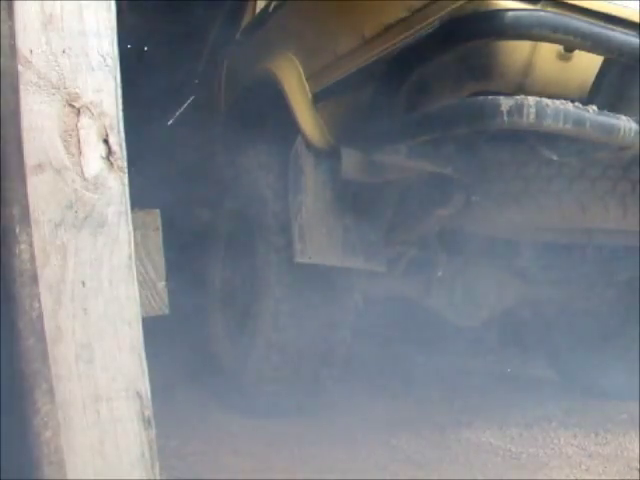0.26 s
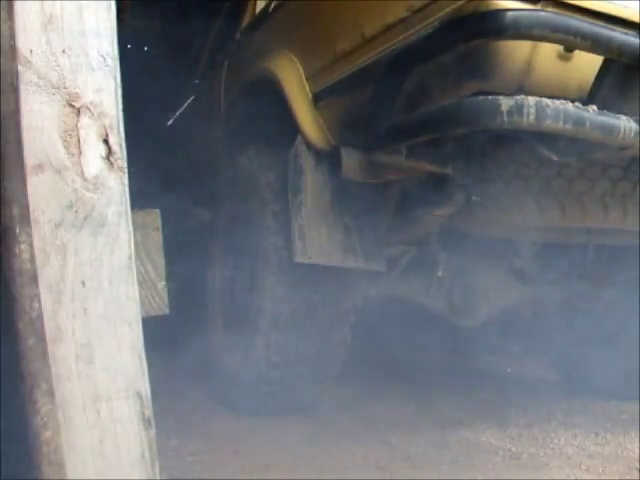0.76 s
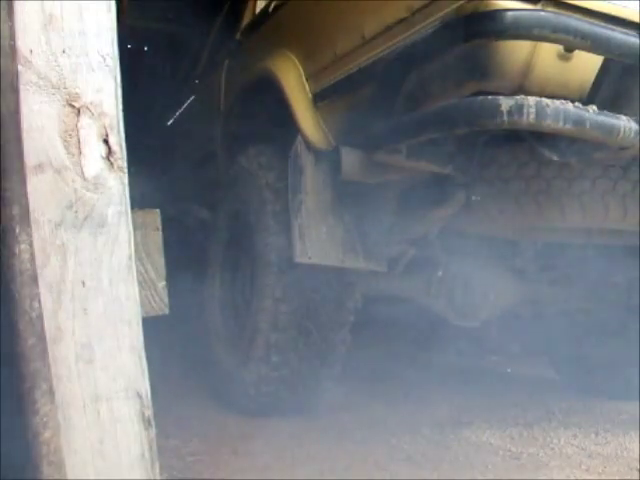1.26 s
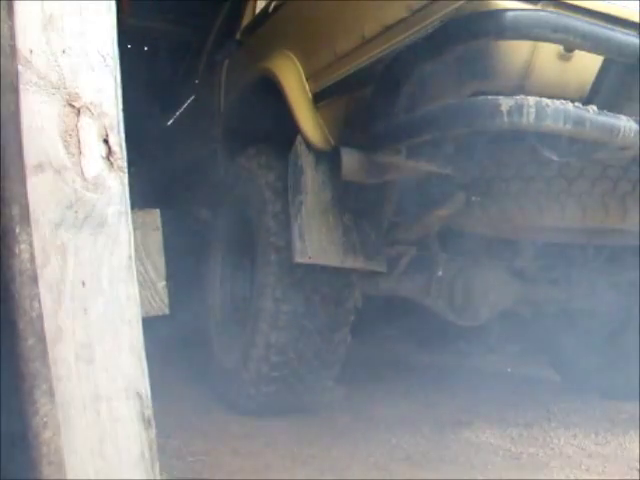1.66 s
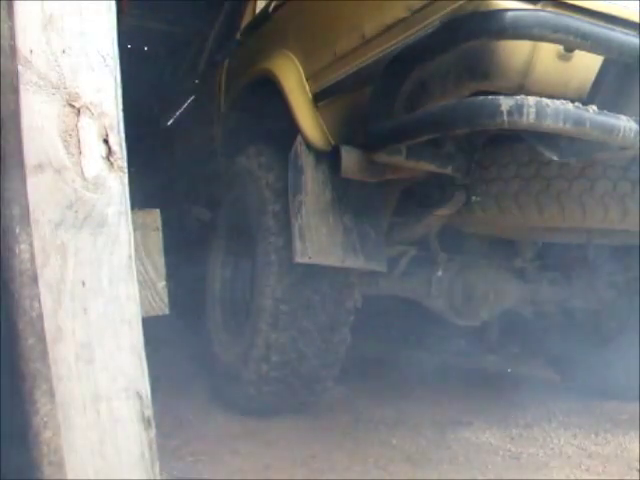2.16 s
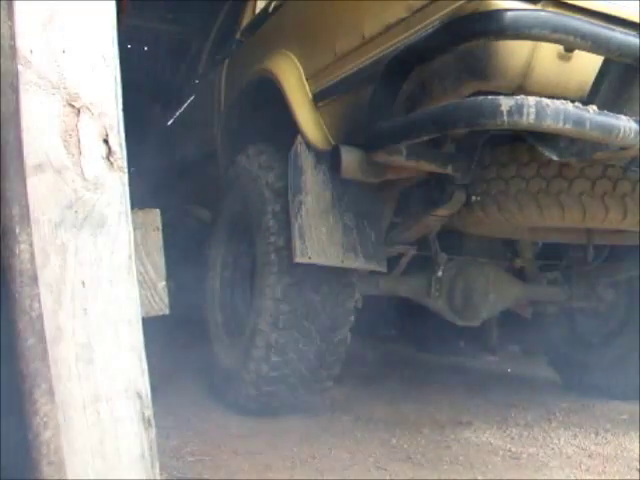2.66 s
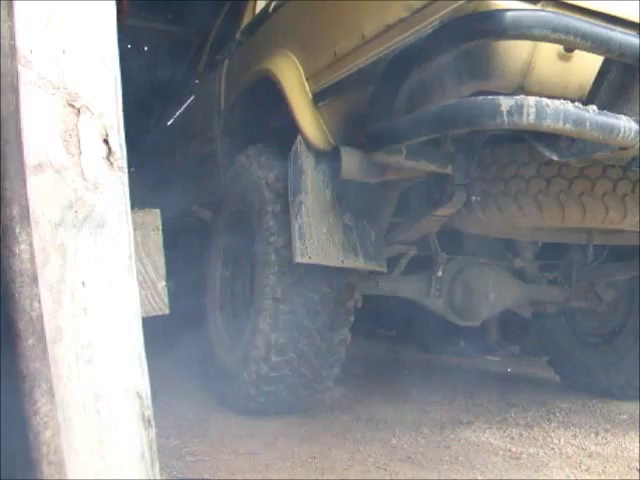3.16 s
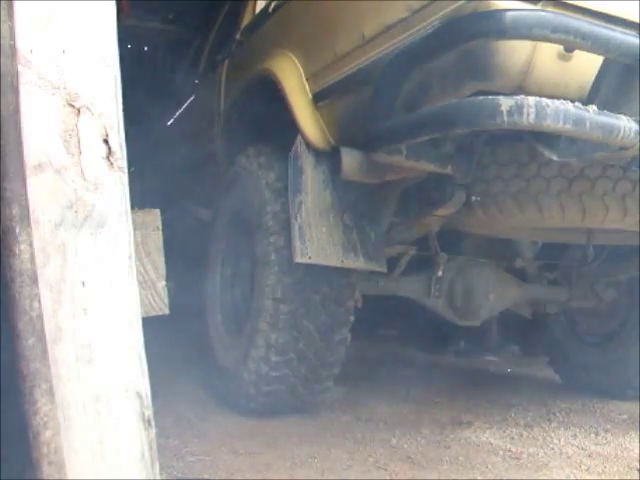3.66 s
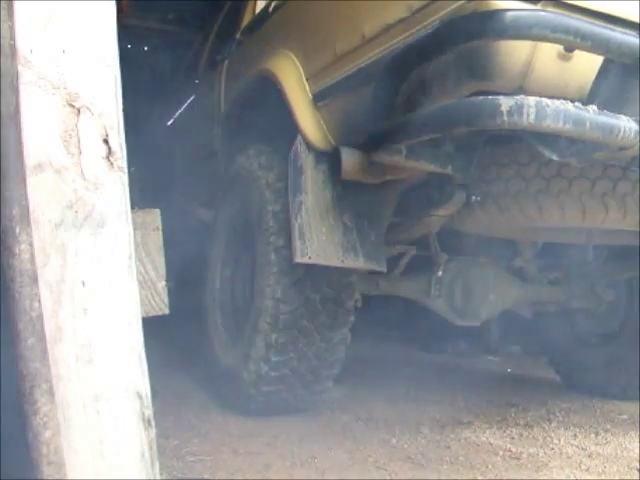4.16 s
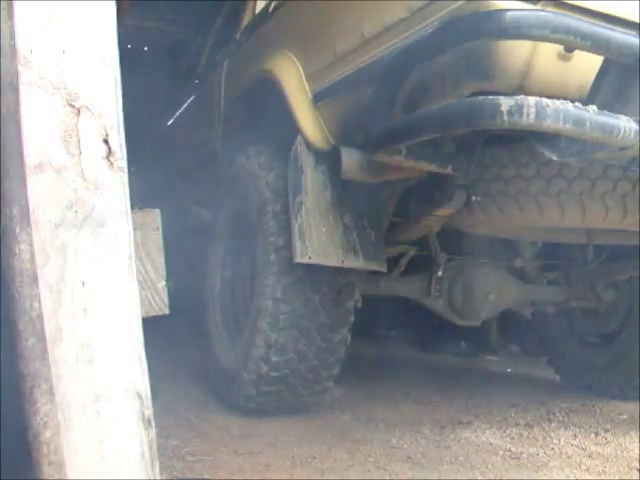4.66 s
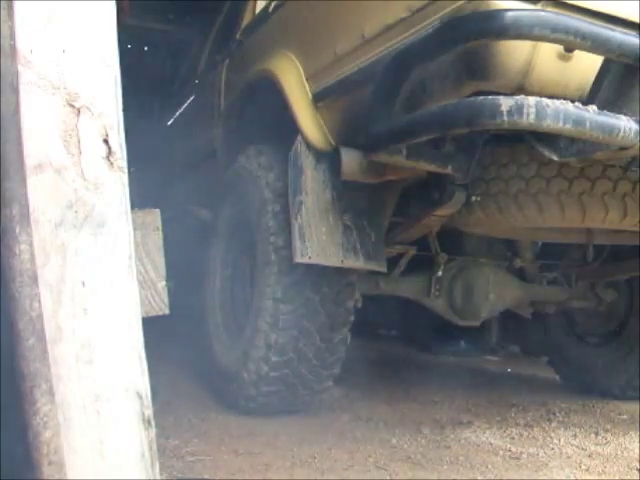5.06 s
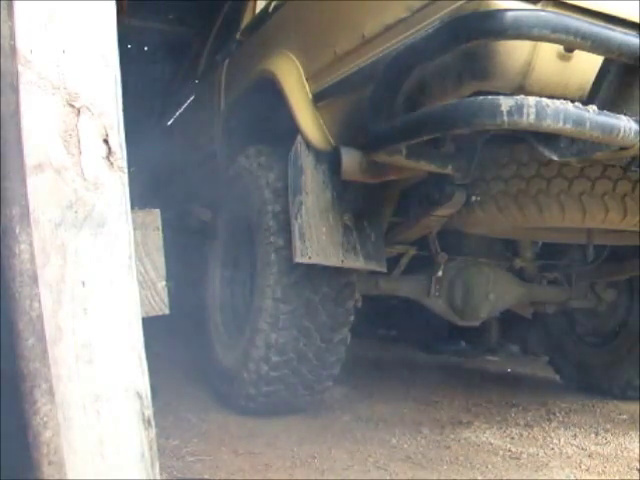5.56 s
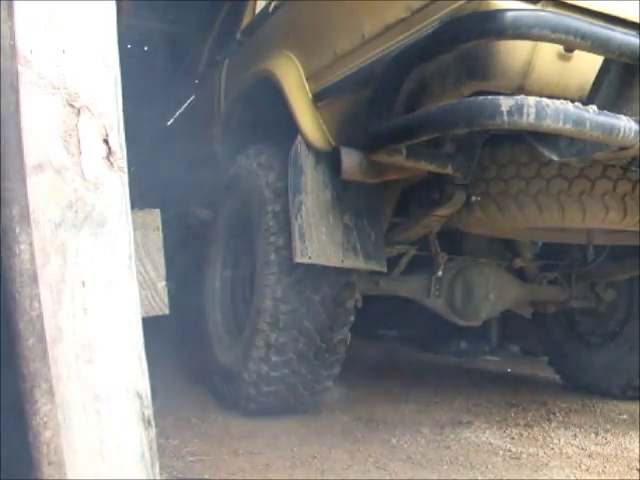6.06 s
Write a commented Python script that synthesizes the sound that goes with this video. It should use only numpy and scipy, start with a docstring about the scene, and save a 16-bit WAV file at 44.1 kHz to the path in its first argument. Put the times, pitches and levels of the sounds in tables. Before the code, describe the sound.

Continuous diesel clatter from a truck in a shed, already running at the start and still running at the end. Rapid knocking varies from soft to hard bangs, with a few firings barely catching. A rough low bark in the exhaust fades over the first two seconds while a deep steady boom grows. Piston thuds, light metal rattle and noisy fan rush fill the gaps, with short shed reverberation. Close mono microphone, dull extreme treble.

```python
"""Uneven diesel knocking comes first: a cold four-cylinder truck idles in a shed, settling from 760 to 718 rpm.
Each firing strikes the block with coloured echo clusters, and hard firings ring more strongly near 2 kHz.
Puffs through pipe resonances throb over a tone at three times the firing rate; one cylinder's bark fades.
Pistons thud and loose metal clacks in shaped noise, over a rush of fan, gears and gas made of coloured noise."""
import sys
import numpy as np
from scipy import signal
from scipy.fft import rfft, irfft, next_fast_len
from scipy.io import wavfile
from scipy.ndimage import uniform_filter1d

SR = 44100
rng = np.random.default_rng(int(sys.argv[2]) if len(sys.argv) > 2 else 0)


def master_out(mix):
    """Clip the mix to full scale and print it as 16-bit PCM to the path in sys.argv[1]."""
    frames = np.transpose(np.atleast_2d(mix))
    ceiling = np.clip(frames, -1, 1)
    pcm = np.round(ceiling * 32767).astype(np.int16)
    wavfile.write(sys.argv[1], SR, pcm)


N = 279153
TIME = np.arange(N) / SR


def amp(db):
    """Decibels to gain."""
    return 10 ** (np.asarray(db) / 20)


def unit(x):
    """Scale to rms 1."""
    return x / np.sqrt(np.mean(x ** 2) + 1e-20)


def curves(rows):
    """One value per sample for each column after the time."""
    knots, *columns = np.transpose(rows)
    return [np.interp(TIME, knots, column) for column in columns]


def colour(points, hz):
    """Gain of (f/Hz, level/dB) points joined on a log axis."""
    f, db = np.transpose(points)
    return amp(np.interp(np.log(hz + 1), np.log(f + 1), db))


def filtered(x, response):
    """x shaped by a response of frequency, padded so that its tail does not wrap round."""
    size = next_fast_len(len(x) + 8192)
    hz = np.fft.rfftfreq(size, 1 / SR)
    return irfft(rfft(x, size) * response(hz), size)[:len(x)]


def strike(times, sizes, response):
    """A copy of the response at each time, scaled by its size."""
    samples = np.clip(np.round(times * SR).astype(int), 0, N)
    train = np.bincount(samples, sizes, N + 1)
    return signal.fftconvolve(train, response)[:N]


# resonances of block, sump and chassis: f/Hz, width/Hz, lift/dB (negative is a dip)
BLOCK_RESONANCES = [(416, 140, 4.5), (559, 11, 8), (625, 13, 9), (735, 39, 6.5), (829, 25, 5),
                    (1132, 41, 6), (1581, 18, 9), (1798, 14, 6), (1986, 23, 5.5), (1954, 26, -3.5),
                    (2100, 26, -2.5), (2220, 26, -2.5), (2220, 31, 4.5), (2360, 22, 6), (2486, 50, 7.5)]


def metal(x, points):
    """x coloured by the points and by the engine's resonances, at rms 1."""
    def response(hz):
        lift_db = sum(db / (1 + (2 * (hz - f) / width) ** 2) for f, width, db in BLOCK_RESONANCES)
        return colour(points, hz) * amp(lift_db)
    return unit(filtered(x, response))


def echoes(fade, smoothing_bins=41):
    """A dense cluster of echoes under a fade, even in colour, of energy 1."""
    spectrum = rfft(fade * rng.standard_normal(len(fade)))
    smooth_power = uniform_filter1d(np.abs(spectrum) ** 2, smoothing_bins)
    cluster = irfft(spectrum / np.sqrt(smooth_power), len(fade))
    return cluster / np.linalg.norm(cluster)


def blows(times, cylinder, db, points, fade, fresh):
    """Each cylinder's blow repeats its own echo cluster; the fresh share of power is ever-new loose rattle."""
    power = np.abs(strike(times, amp(db) ** 2, fade ** 2))
    repeated = np.zeros(N)
    for c in range(len(CYLINDERS)):
        own = cylinder == c
        repeated += strike(times[own], amp(db[own]), echoes(fade))
    rattle = np.sqrt(power) * metal(rng.standard_normal(N), points)
    repeated_gain = np.sqrt((1 - fresh) * np.mean(power))
    return repeated_gain * metal(repeated, points) + np.sqrt(fresh) * rattle


# crankshaft speed: t/s, speed/rpm
CRANK_SPEED = [(0, 760.2), (.4, 763.4), (.9, 746.3), (1.7, 744.4), (2.2, 733.4), (3.2, 731.1), (4, 728.4),
               (4.6, 730.3), (5.2, 722.6), (6.33, 718.4)]


def firings(count=4):
    """Phase in firings per sample, then each firing's time and cylinder: four to every two crank turns."""
    turns_per_s = curves(CRANK_SPEED)[0] / 60
    phase = np.cumsum(turns_per_s * 2) / SR
    number = np.arange(int(phase[-1]) + 1)
    return phase, np.interp(number, phase, TIME), number % count


# loudness of the rush of fan, gears and gas: t/s, level/dB
RUSH_LEVEL = [(0, -29), (2, -30.5), (4.5, -28), (6.33, -32.5)]
# tone of the rush, before the block's resonances: f/Hz, level/dB
RUSH_COLOUR = [(25, -0.5), (60, -3.5), (170, 14), (280, 0), (410, 0.5), (600, -0.5), (1000, -4.5),
               (2200, -6.5), (3100, -4.5), (4200, -9.5), (5500, -12.5), (7300, -8), (8500, -18)]


def fan():
    """Fan, gears and gas make a continuous rush: noise through the engine's resonances, slowly changing level."""
    return amp(curves(RUSH_LEVEL)[0]) * metal(rng.standard_normal(N), RUSH_COLOUR)


# clacks of loose metal that stand out, loud or bright:
# t/s, level/dB before the fade, bright edge against it/dB
STANDOUT_CLACKS = [(.473, -36, 2.5), (.792, -28.5, 0.5), (1.434, -36, -4), (2.898, -23.5, -1.5),
                   (4.095, -28, -4), (5.527, -30, -13), (5.704, -33.5, 2), (5.871, -36, 5)]
# body of a clack, before the block's resonances: f/Hz, level/dB
CLACK_COLOUR = [(500, -21), (1300, -12), (1800, -1), (2500, -13.5), (3200, 5.5), (3700, -7.5), (4350, 5.5),
                (5200, -10), (8000, -21.5)]
# bright edge of a clack, before the block's resonances: f/Hz, level/dB
SPARKLE_COLOUR = [(3000, -17), (5500, -9.5), (6300, 3.5), (7200, 2.5), (8500, -12)]


def clacks(jolts, attack_s=0.004, t60_s=0.25, jolt_db=-35, jolt_scatter_db=2.5, jolt_edge_db=-15):
    """Each jolt shakes loose metal lightly; a few clacks stand out, loud or bright. All die away in the shed."""
    light_db = jolt_db + jolt_scatter_db * rng.standard_normal(len(jolts))
    light = np.column_stack([jolts, light_db, np.full(len(jolts), jolt_edge_db)])
    times, db, edge_db = np.vstack([STANDOUT_CLACKS, light]).T
    t = np.arange(SR // 2) / SR
    fade = (1 - np.exp(-t / attack_s)) * amp(-60 * t / t60_s)

    def bursts(level_db, points):
        power = np.abs(strike(times, amp(level_db) ** 2, fade ** 2))
        return np.sqrt(power) * metal(rng.standard_normal(N), points)

    return bursts(db, CLACK_COLOUR) + bursts(db + edge_db, SPARKLE_COLOUR)


# resonances of exhaust pipe and silencer: f/Hz, width/Hz, level/dB
PIPE_RESONANCES = [(42.4, 9.1, -10), (77.76, 12.3, -5), (138.2, 19, -5), (155.5, 17, -7.5),
                   (205.7, 14.3, -13), (296, 16, -22)]


def pipe(hz):
    """Pipe and silencer resonate as parallel band-passes of alternating sign."""
    response = 0
    for k, (f, width, db) in enumerate(PIPE_RESONANCES):
        damping = 1j * hz * width
        response = response + (-1) ** k * amp(db) * damping / (f * f - hz * hz + damping)
    return response


# exhaust layers: t/s, pipe boom level/dB, puffs level/dB, cold cylinder's bark level/dB
EXHAUST_LEVELS = [(0, -27, -21.5, -28), (.6, -25, -22.5, -31), (1, -20, -22, -32.5),
                  (1.7, -19.5, -21.5, -35), (2.3, -19.5, -23, -41), (4.5, -19.5, -24, -43),
                  (6.33, -19.5, -25.5, -47)]


def exhaust(phase, times, cylinder, scatter_db=0.54, boom_lead_s=0.001,
            bark_hz=152, bark_lead_s=0.0111, bark_decay_s=0.0075):
    """One gas puff per firing rings the pipe; the cold last cylinder adds a short bark."""
    boom_db, puff_db, bark_db = curves(EXHAUST_LEVELS)
    size_db, lead_s = np.array(CYLINDERS)[cylinder].T[5:]
    sizes = amp(size_db + scatter_db * rng.standard_normal(len(times)))
    puffs = -unit(filtered(strike(times - lead_s, sizes, [1]), pipe))

    # the pipe's standing wave locks to three times the firing rate
    led_phase = phase + boom_lead_s * SR * np.gradient(phase)
    boom = unit(np.cos(2 * np.pi * 3 * led_phase))

    t = np.arange(SR // 10) / SR
    cold = cylinder == len(CYLINDERS) - 1
    burst = -t * np.exp(-t / bark_decay_s) * np.sin(2 * np.pi * bark_hz * t)
    bark = unit(strike(times[cold] - bark_lead_s, sizes[cold], burst))
    return amp(boom_db) * boom + amp(puff_db) * puffs + amp(bark_db) * bark


# tone of the pistons' thud, before the block's resonances: f/Hz, level/dB
THUD_COLOUR = [(150, -15), (220, 4.5), (310, -5), (400, 4), (520, -1.5), (740, -1), (1000, -1.5),
               (1400, -13.5), (2500, -30.5), (5000, -38)]


def thud(times, cylinder, level_db=-29, attack_s=0.0055, t60_s=0.45):
    """Pistons and valve gear thud equally hard at every firing, however the fuel burns."""
    t = np.arange(16384) / SR
    fade = (1 - np.exp(-t / attack_s)) * amp(-60 * t / t60_s)
    return blows(times, cylinder, np.full(len(times), level_db), THUD_COLOUR, fade, fresh=0.093)


# the idle hunts, all cylinders burning harder or softer together: t/s, hardness/dB
IDLE_HUNTING = [(0, -2.5), (.5, 1), (1.05, -2), (1.65, -1.5), (2.2, -2), (2.65, 1.5), (3.35, -1), (3.9, -2),
                (4.4, 1), (4.85, -0.5), (5.3, -1.5), (6.33, -1.5)]
# chance unevenness of each cylinder, in firing order: spread/dB
CYLINDER_SCATTER = [2.8, 1.3, 2.0, 1.5]
# hardest bangs of cold fuel, in place of hunting and chance: t/s, hardness/dB
HARD_BANGS = [(.194, 4), (.352, 3), (.509, 5.5), (.791, 6), (1.149, 5), (1.273, 4), (1.632, 3.5),
              (1.756, 3.5), (1.918, 4.5), (2.118, 3.5), (2.446, 3.5), (3.472, 6), (3.637, 6), (3.759, 5.5),
              (3.966, 6.5), (4.088, 3.5), (4.379, 6.5), (4.789, 7), (4.911, 5), (5.119, 6), (5.408, 6),
              (5.575, 4.5), (5.784, 6.5), (6.241, 5.5)]
# firings that barely catch: t/s
MISFIRE_TIMES = [1.473, 3.392, 5.452, 5.828]


def hardness(times, cylinder, misfire_db=-7.5):
    """Hardness of each burn in dB: warming, plus idle hunting and chance or a set bang or misfire."""
    warming = np.array(CYLINDERS)[cylinder, 3] * (times - times.mean())
    chance = np.array(CYLINDER_SCATTER)[cylinder] * rng.standard_normal(len(times))
    uneven = np.interp(times, *np.transpose(IDLE_HUNTING)) + chance
    misfires = [(s, misfire_db) for s in MISFIRE_TIMES]
    for s, db in list(HARD_BANGS) + misfires:
        nearest = np.argmin(np.abs(times - s))
        uneven[nearest] = db
    return warming + uneven


def crack(t, crack_db=-7, decay_s=0.00067):
    """The direct sound briefly lifts the start of each knock."""
    return 1 + amp(crack_db) * np.exp(-t / decay_s)


# tone of the knock, before the block's resonances: f/Hz, level/dB
KNOCK_COLOUR = [(150, -27), (260, -9.5), (400, -4.5), (520, -8), (740, -2.5), (1000, -6.5), (1350, -2),
                (1600, -0.5), (1830, 4), (2100, -8.5), (2800, -20), (4400, -16.5), (7200, -15.5),
                (9000, -36)]


def knock(times, cylinder, db, attack_s=0.0007, direct_t60_s=0.12, direct_db=3, shed_t60_s=0.36, shed_db=-1):
    """Ignition cracks against the block at once, and the shed carries it on with a slower decay."""
    t = np.arange(16384) / SR
    direct = amp(direct_db - 60 * t / direct_t60_s)
    shed = amp(shed_db - 60 * t / shed_t60_s)
    fade = (1 - np.exp(-t / attack_s)) * np.hypot(direct, shed)
    return blows(times, cylinder, db, KNOCK_COLOUR, fade * crack(t), fresh=0.12)


# tone of the block's ring, before its resonances: f/Hz, level/dB
RING_COLOUR = [(900, -32), (1600, -15), (1950, 0), (2200, 1), (2470, -4.5), (2750, -10.5), (3400, -22),
               (4300, -13.5), (5300, -28), (8000, -49.5)]


def ring(times, cylinder, db, attack_s=0.00033, length_s=0.063):
    """The block's ring holds for a moment between the walls, then falls away."""
    t = np.arange(16384) / SR
    fade = (1 - np.exp(-t / attack_s)) * np.exp(-(t / length_s) ** 2)
    return blows(times, cylinder, db, RING_COLOUR, fade, fresh=0.09)


# cylinders in firing order: ignition lag/s, usual knock level/dB, usual ring level/dB,
# hardness change with warming/(dB/s), knock per hardness/(dB/dB), relative puff level/dB, puff lead/s
CYLINDERS = [(.0005, -25, -27.5, -0.44, .7, 4.5, .0173), (-.0028, -27, -23, -0.47, 0.3, 6, 0.01623),
             (-.0012, -28.3, -25, -0.14, 0.67, 5.5, .017), (.0005, -28, -30.5, -0.8, 0.7, 1.5, 0.0173)]


def combustion(times, cylinder, knock_scatter_db=1.58, jitter_s=.00004):
    """Cold fuel lights unevenly: the ring follows the hardness of each firing fully, the knock in part."""
    lag_s, knock_db, ring_db, _, knock_share = np.array(CYLINDERS)[cylinder].T[:5]
    chance = rng.standard_normal((len(times), 2))
    hard_db = hardness(times, cylinder)
    knock_db = knock_db + knock_share * hard_db + knock_scatter_db * chance[:, 0]
    ignition = times + lag_s + jitter_s * chance[:, 1]
    return knock(ignition, cylinder, knock_db) + ring(ignition, cylinder, ring_db + hard_db)


def scene():
    """Rush, clacks, exhaust, thuds and combustion, mixed to one channel."""
    phase, times, cylinder = firings()
    # the first cylinder jolts the engine once a cycle, from its second firing on
    jolts = times[cylinder == 0][1:]
    background = fan() + clacks(jolts) + exhaust(phase, times, cylinder)
    return (background + thud(times, cylinder) + combustion(times, cylinder))[None]


def record(dry, top_hz=8000):
    """The treble ends steeply just below 8 kHz, with nothing from 8.5 kHz up."""
    def treble_limit(hz):
        return 1 / np.sqrt(1 + (hz / (top_hz - 250)) ** 70) * (hz < top_hz + 500)
    return np.array([filtered(x, treble_limit) for x in dry])


dry = scene()
out = record(dry)
master_out(out)
```